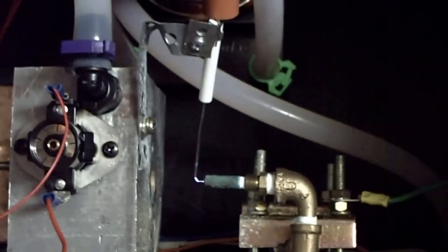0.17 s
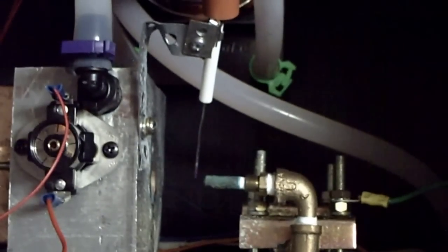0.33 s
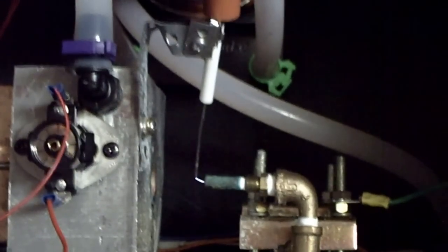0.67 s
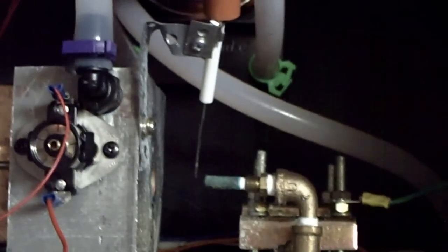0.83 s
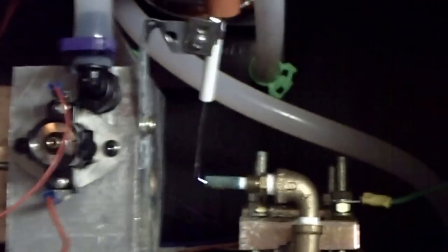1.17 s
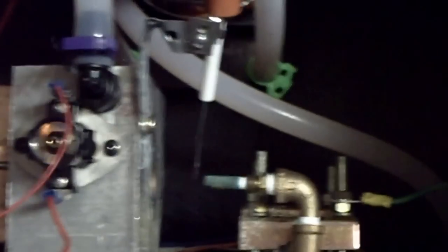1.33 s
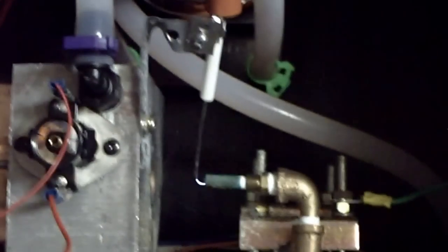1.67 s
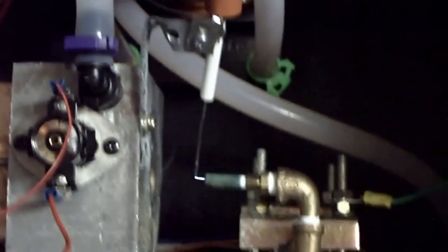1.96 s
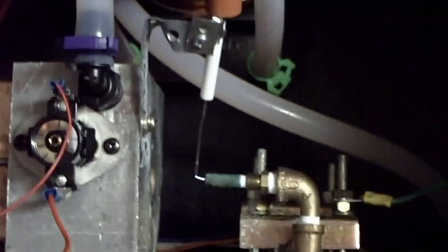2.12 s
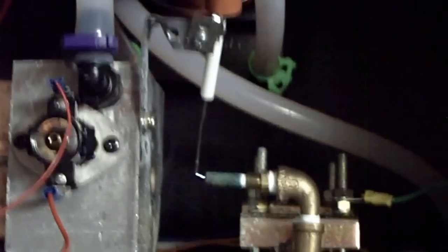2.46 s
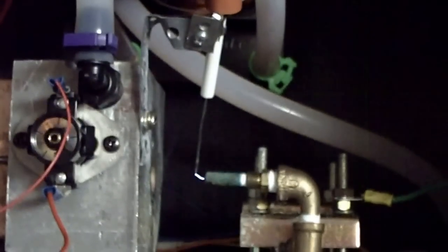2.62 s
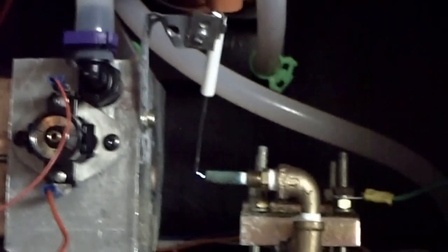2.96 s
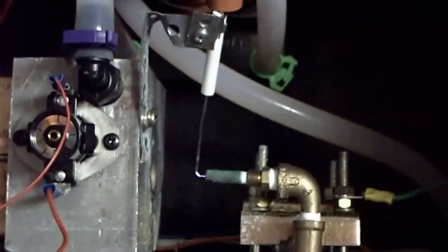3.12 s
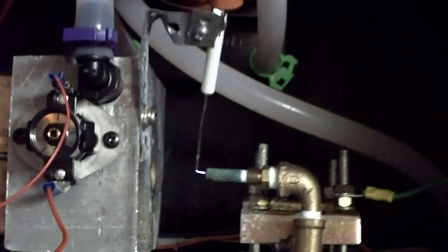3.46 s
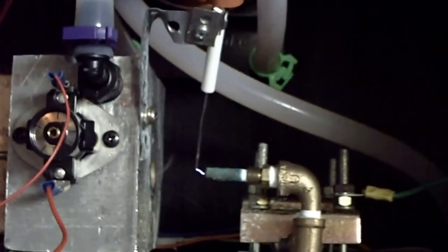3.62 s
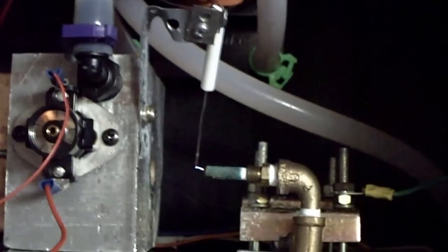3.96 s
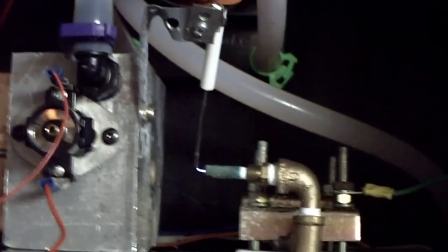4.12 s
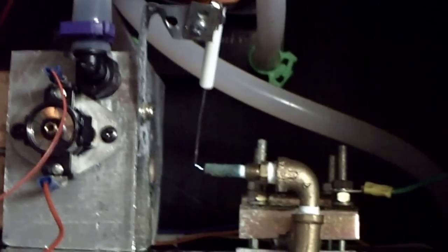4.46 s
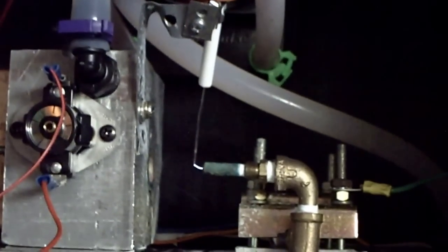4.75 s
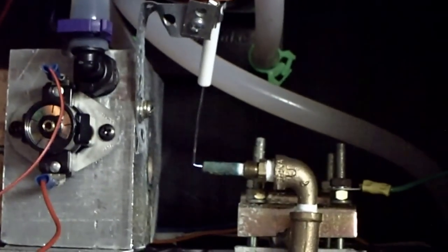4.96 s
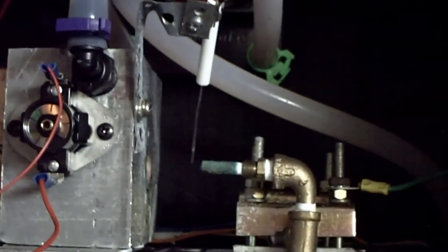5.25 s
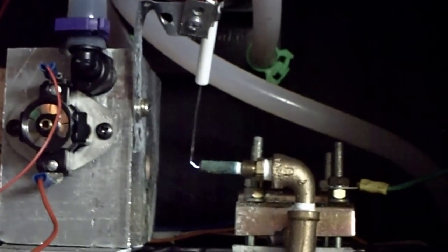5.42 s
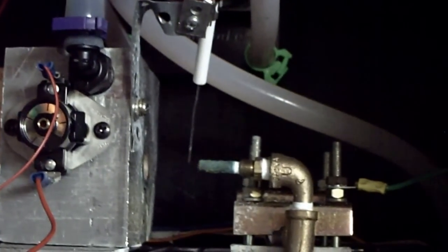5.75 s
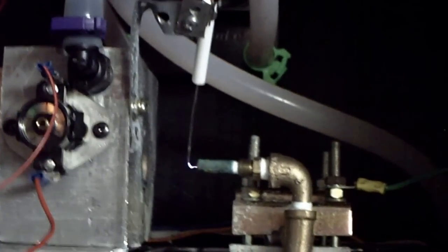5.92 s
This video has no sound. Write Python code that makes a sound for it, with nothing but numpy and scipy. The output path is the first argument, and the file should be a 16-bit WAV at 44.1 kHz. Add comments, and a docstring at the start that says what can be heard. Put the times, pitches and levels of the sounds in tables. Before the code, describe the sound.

Close to the microphone, an electric igniter fires hard, dry snaps about six times a second from start to end. Each is a bright crack with a brief metallic ring and a very short hard-room tail. Far quieter beneath it lie a steady low transformer hum, a motor drone and a soft rush of air. The gas never lights; only sparks are heard.

```python
"""On a metal bench in a hard room, a spark igniter snaps six times a second, close to the microphone.
Each snap is a short pulse; it echoes off fittings and a wall, makes the metal sing and dies in noise tails.
Behind it a transformer hums and a motor drones, both built from sine waves, with other faint tones.
Filtered noise makes the steady rush of air, a narrow whine and a few faint taps."""
import sys
import numpy as np
from scipy import signal
from scipy.fft import rfft, irfft, next_fast_len
from scipy.io import wavfile
from scipy.ndimage import map_coordinates

SR = 44100
rng = np.random.default_rng(int(sys.argv[2]) if len(sys.argv) > 2 else 0)


def amplitude_ratio(level_db):
    """Convert a level in decibels to the matching linear amplitude (field) ratio."""
    exponent = np.asarray(level_db, float) / 20
    return 10 ** exponent


def unload_wav(signal):
    """Save mono or channel-first audio to the path in sys.argv[1] as 16-bit WAV at rate SR, clipped to [-1, 1]."""
    wavfile.write(
        sys.argv[1],
        SR,
        np.round(np.clip(np.atleast_2d(signal).T, -1, 1) * 32767).astype(np.int16),
    )


N = 268392  # length in samples

# fittings around the gap, and in the last row a wall, that throw the snap back:
# delay_ms, relative_strength (minus = flipped)
REFLECTORS = [(.52, -.48), (.98, -.48), (1.3, -.78), (1.75, .55), (2.07, .45), (2.38, .63), (2.97, .51),
              (3.36, -.53), (3.96, -.65), (4.16, .48), (4.39, .5), (12.94, -.25)]
# colour of a snap at the microphone: pitch_hz, relative_level_db
SNAP_COLOUR = [(300, -20.5), (700, -13.5), (1300, -6.5), (2500, -5.5), (4000, -9.5), (5500, -3.5),
               (7000, 0), (9000, 3.5), (10500, -4), (12000, -12), (16000, -16)]
# metal parts that sing after a snap: pitch_hz, width_hz, relative_level_db
METAL_PARTS = [(585, 95, 1.5), (810, 64, 3.5), (1310, 33, -6.5), (2250, 62, -4.5), (2980, 105, -1),
               (3128, 66, 9.5), (3660, 75, 4), (4160, 510, -0.5), (5800, 160, -3), (6620, 68, -1),
               (7760, 56, 1.5), (8070, 35, 4), (9710, 65, -3.5), (11030, 130, -9), (12100, 180, -16)]
# quick decay close by on the bench: pitch_hz, time_to_fall_60_db_s
BENCH_DECAY = [(1000, 0.028), (3000, 0.029), (8000, 0.031), (13000, 0.053)]
# slow decay of the room: pitch_hz, time_to_fall_60_db_s
ROOM_DECAY = [(1000, 0.081), (3000, 0.15), (8000, 0.14), (13000, 0.14)]
# faint taps, level before fading in and out: start_s, level_db, pitch_hz
TAPS = [(.1294, -56, 7900), (0.2918, -56, 5900), (1.23, -46, 1000), (1.4729, -59, 1490), (1.629, -54, 5970),
        (2.313, -54, 1490), (2.8013, -54, 2000), (3.1003, -47, 1180), (3.43, -50, 1580),
        (3.6411, -53, 6000), (4.056, -46, 1000), (5.801, -49, 900)]
# lines of the transformer hum: multiple_of_mains, level_db (rms)
TRANSFORMER_LINES = [(2, -50.5), (3, -59), (4, -45.5), (5, -64), (8, -75), (14, -74), (18, -71.5)]
# lines of the motor: multiple_of_shaft_speed, level_db (rms)
MOTOR_LINES = [(1, -52.5), (2, -58), (3, -65), (4, -50.5), (5, -65.5), (8, -63.5), (10, -67.5), (11, -73),
               (12, -65), (16, -67)]
# other faint unsteady tones: pitch_hz, level_db (rms)
FAINT_TONES = [(136.5, -62), (204, -61.5), (324, -61.5), (356, -71), (436, -72), (456, -75), (575.7, -71),
               (600, -75)]
# colour of the rushing air and rumble: pitch_hz, relative_level_db (per Hz)
AIR_COLOUR = [(20, -8.5), (60, -13), (95, -3), (170, -3), (330, -11.5), (400, -17.5), (460, -13),
              (540, -20), (1000, -18.5), (1400, -25.5), (1700, -26.5), (3000, -27), (5800, -32.5),
              (8000, -32), (10200, -35.5), (11200, -46), (12800, -46), (14000, -69)]
# narrow whine, width from the middle out to 1/e: pitch_hz, width_hz, level_db (rms)
WHINE = (4090, 90, -70)
# sparks that need one mains cycle more: spark_number
MISSED = [4, 33]
# sparks that break down a little after the crest: spark_number, lag_ms
LATE = [(5, .6), (7, 2.2), (8, 1.2), (12, 2.7), (17, .8), (18, .7), (19, .5), (21, .7), (22, .5), (32, 3.5),
        (34, .9), (35, .6)]
# strength of each spark in turn, 3 dB above the rms of its first 20 ms: level_db
STRENGTH_DB = [-27.5, -27.5, -28.5, -27.5, -28, -28, -28.5, -29, -27.5, -27.5, -27.5, -29, -26.5, -28,
               -27.5, -27.5, -29.5, -28, -27.5, -28, -28.5, -28.5, -26, -26.5, -28, -25.5, -27.5, -26, -26,
               -26, -27.5, -28.5, -27, -29, -26.5, -28, -28]
# the arc fattens, then thins: time_s, bass_db
BODY = [(0, -2), (0.9, -3), (2.5, -0.3), (4.6, 0.2), (6, -2.5)]

MAINS_HZ, MOTOR_HZ = 60, 83.92
# the igniter charges for ten mains cycles and fires near the next crest
FIRST_S, CHARGE_CYCLES = -0.004, 10
BODY_SCATTER_DB = 1.9  # random change in bass from spark to spark
# direct sound; chance that the electrode hides an arc, and the loss when it does
DIRECT_DB, SHADOWED, SHADOW_DB = 1.4, 0.25, -3
AIR_DB = -47.5  # middle level of the rush


def unit(x):
    """Scaled to rms 1."""
    return x / np.sqrt(np.mean(x ** 2) + 1e-20)


def along(points, hz):
    """(Hz, value) points read on a log frequency axis."""
    f, v = np.transpose(points)
    return np.interp(np.log(hz + 1), np.log(f + 1), v)


def wobble(rate):
    """A smooth random curve through `rate` random points a second."""
    points = rng.standard_normal(int(N * rate / SR) + 4)
    return map_coordinates(points, [np.arange(N) * rate / SR])


def filtered(x, response):
    """x times a complex response of frequency."""
    n = x.shape[-1]
    m = next_fast_len(n + 8192)
    spectrum = rfft(x, m) * response(np.fft.rfftfreq(m, 1 / SR))
    return irfft(spectrum, m)[..., :n]


def shelf(db, corner_hz):
    """A smooth gain on what lies below the corner, adding nothing before the sound."""
    return lambda f: (amplitude_ratio(db) + 1j * f / corner_hz) / (1 + 1j * f / corner_hz)


def tone(turns, db, waver_db):
    """A sine wave on a running count of turns, slightly unsteady in level."""
    level = np.sqrt(2) * amplitude_ratio(db + waver_db * wobble(6.1))
    return level * np.sin(2 * np.pi * (turns + rng.random()))


def spark_times():
    """Mains cycles counted up to each spark, plus its breakdown lag."""
    number = np.arange(len(STRENGTH_DB))
    # each missed cycle also delays every later spark
    cycles = CHARGE_CYCLES * number + np.searchsorted(MISSED, number, side='right')
    which, ms = np.transpose(LATE)
    lag_s = np.bincount(which.astype(int), ms, len(number)) / 1000
    return FIRST_S + cycles / MAINS_HZ + lag_s


def snap_pulse(spectrum, size):
    """The shortest pulse with this colour, nothing before its start, peak 1."""
    log_level = np.log(amplitude_ratio(along(spectrum, np.fft.rfftfreq(size, 1 / SR))) + 1e-6)
    # folding the cepstrum forward puts all the energy after the start
    ceps = irfft(log_level, size)
    ceps[1:size // 2] *= 2
    ceps[size // 2 + 1:] = 0
    pulse = irfft(np.exp(rfft(ceps)), size)
    return pulse / np.abs(pulse).max()


def ringing(f):
    """The metal parts as resonators, each strongest at its own pitch."""
    return sum(amplitude_ratio(db) * 1j * f * w / (c * c - f * f + 1j * f * w) for c, w, db in METAL_PARTS)


def early_echoes(count):
    """Echoes off fittings and a wall; the arc lands elsewhere each time, so each path changes slightly."""
    hz = np.fft.rfftfreq(1024, 1 / SR)
    delay_ms, strength = np.transpose(REFLECTORS)
    strengths = strength * amplitude_ratio(2.2 * rng.standard_normal((count, len(strength))))
    delays_s = delay_ms / 1000 + 1.2e-5 * rng.standard_normal(strengths.shape)
    # a delay is a steady turning of phase along frequency
    phases = np.exp(-2j * np.pi * delays_s[..., None] * hz)
    echoes = irfft(np.einsum('se,sef->sf', strengths, phases))
    # the echoes have less bass: small fittings reflect the treble better
    return amplitude_ratio(-3.0) * filtered(echoes, shelf(-3.5, 5700))


def tails(decays, count, size):
    """Noise tails in which each frequency dies at its own speed."""
    hz, t, z = signal.stft(rng.standard_normal((count, size)), SR, nperseg=128)
    fade = amplitude_ratio(-60 * t / along(decays, hz)[:, None])
    return signal.istft(z * fade, SR, nperseg=128)[1][:, :size]


def surroundings(times, size):
    """One blurred answer per spark: partly the same, drifting slowly, partly new as the arc wanders."""
    t = np.arange(size) / SR
    near = tails(BENCH_DECAY, len(times) + 3, size)
    far = tails(ROOM_DECAY, len(times) + 3, size)
    # only the bench sings; the room answers later and evenly
    bench = amplitude_ratio(-13.0) * filtered(near * (1 - np.exp(-(t / 0.0017) ** 2)), lambda f: 1 + ringing(f))
    room = amplitude_ratio(-23) * far * (1 - np.exp(-t / 0.0041))
    field = bench + room
    turn = 0.83 * times[:, None]  # drift in radians
    drifting = np.cos(turn) * field[1] + np.sin(turn) * field[2]
    lasting = 0.87 * field[0] + .5 * drifting
    return lasting + .5 * field[3:]


def igniter():
    """Each arc is a tiny shock wave; a fatter arc has more body."""
    times = spark_times()
    count, size = len(times), SR // 4
    body_db = np.interp(times, *np.transpose(BODY)) + BODY_SCATTER_DB * rng.standard_normal(count)
    direct_db = DIRECT_DB + SHADOW_DB * (rng.random(count) < SHADOWED)
    early = early_echoes(count)
    early[:, 0] += amplitude_ratio(direct_db)
    paths = surroundings(times, size)
    # the shock and its echoes make the metal sing at once
    paths[:, :early.shape[1]] += filtered(early, lambda f: 1 + amplitude_ratio(1.5) * ringing(f))
    pulse = snap_pulse(SNAP_COLOUR, size=512)
    snaps = signal.fftconvolve(paths, pulse[None], axes=1)[:, :size]
    snaps = filtered(snaps, shelf(body_db[:, None], 6900))
    out = np.zeros(N + 2 * size)  # spare room at both ends
    for start, level_db, snap in zip(times, STRENGTH_DB, snaps):
        head = snap[:SR // 50]
        scaled = amplitude_ratio(level_db) * snap / np.sqrt(2 * np.mean(head ** 2))
        out[size + round(start * SR):][:size] += scaled
    return out[size:size + N]


def transformer():
    """The hum: sine waves at whole multiples of the mains, which stand still in pitch."""
    t = np.arange(N) / SR
    return sum(tone(k * MAINS_HZ * t, db, waver_db=0.2) for k, db in TRANSFORMER_LINES)


def motor():
    """The drone: the shaft speed wanders a little, which blurs the upper lines."""
    shaft_turns = np.cumsum(MOTOR_HZ * (1 + 0.001313 * wobble(3))) / SR
    return sum(tone(k * shaft_turns, db, waver_db=0.3) for k, db in MOTOR_LINES)


def faint_tones():
    """Other sine waves of fixed pitch that swell and sink at random."""
    t = np.arange(N) / SR
    return sum(tone(hz * t, db, waver_db=4.5) for hz, db in FAINT_TONES)


def air():
    """A steady rush: noise shaped by its colour table, almost constant in level."""
    rush = unit(filtered(rng.standard_normal(N), lambda f: amplitude_ratio(along(AIR_COLOUR, f))))
    return amplitude_ratio(AIR_DB + 0.31 * wobble(2.18)) * rush


def whine():
    """A whine: noise kept only in a narrow band, slightly unsteady in level."""
    hz, width, db = WHINE
    band = unit(filtered(rng.standard_normal(N), lambda f: np.exp(-((f - hz) / width) ** 2)))
    return amplitude_ratio(db + 0.5 * wobble(5.3)) * band


def taps():
    """Faint short taps and ticks in the room: bands of noise that rise fast and die away."""
    out, t = np.zeros(N), np.arange(SR // 10) / SR
    rise = 1 - np.exp(-t / 0.0011)
    for s, db, hz in TAPS:
        knock = filtered(rng.standard_normal(len(t)), lambda f: np.exp(-((f - hz) / (0.48 * hz)) ** 2))
        fade = amplitude_ratio(db - 60 * t / 0.077)  # falls 60 dB in 77 ms
        out[round(s * SR):][:len(t)] += fade * rise * unit(knock)
    return out


def scene():
    """All sources at one microphone."""
    background = transformer() + motor() + faint_tones() + air() + whine()
    return (igniter() + background + taps())[None]


def low_pass(x):
    """Removes everything above the highest recorded frequency."""
    return signal.sosfilt(signal.butter(12, 14010, fs=SR, output="sos"), x)


def record(dry):
    """A steep treble cut without delay, which rings just ahead of each snap."""
    edged = filtered(dry, lambda f: 1 / (1 + (f / 12800) ** 36))  # half at 12800 Hz
    return low_pass(edged)


dry = scene()
out = record(dry)
unload_wav(out)
```